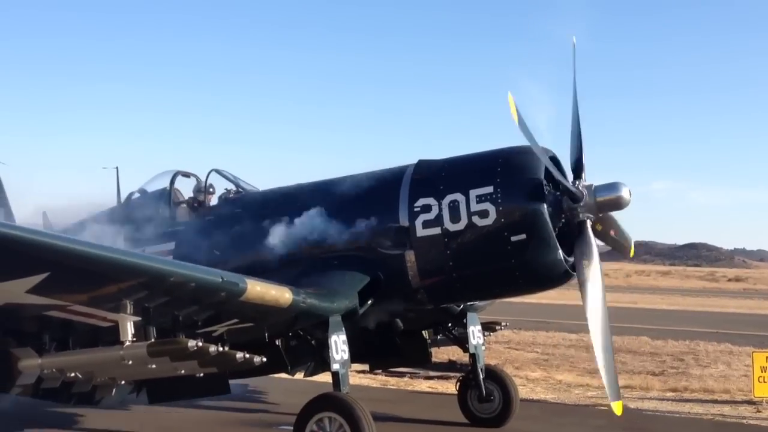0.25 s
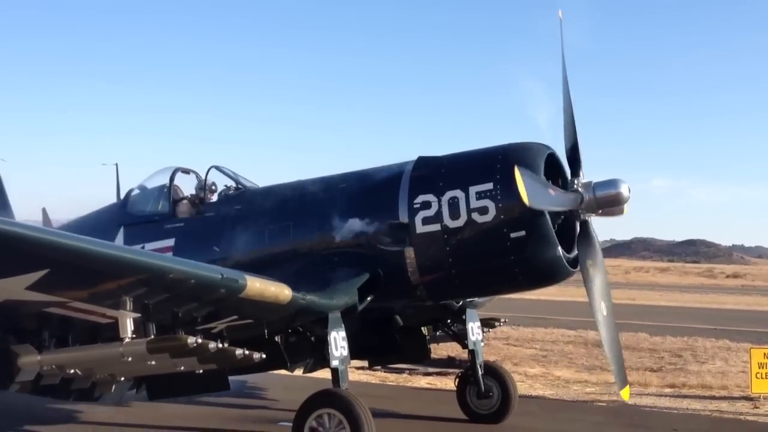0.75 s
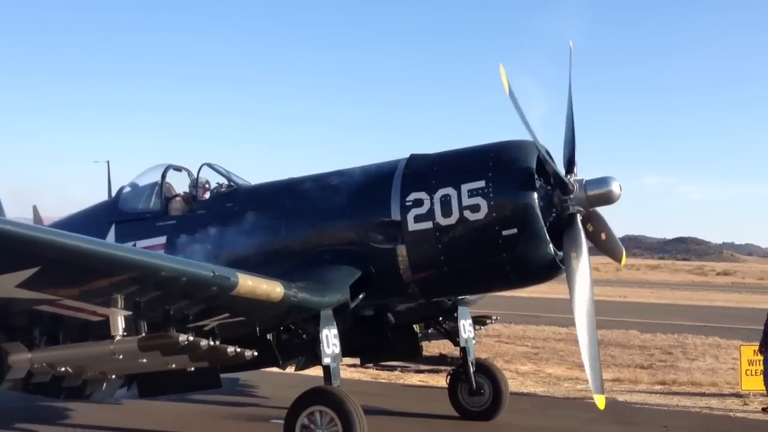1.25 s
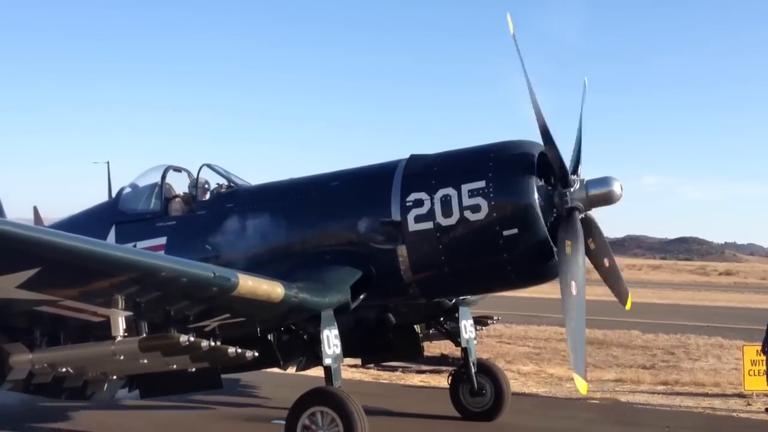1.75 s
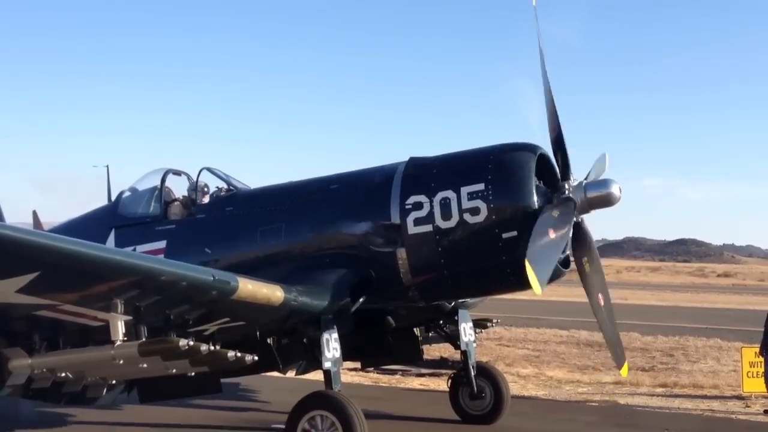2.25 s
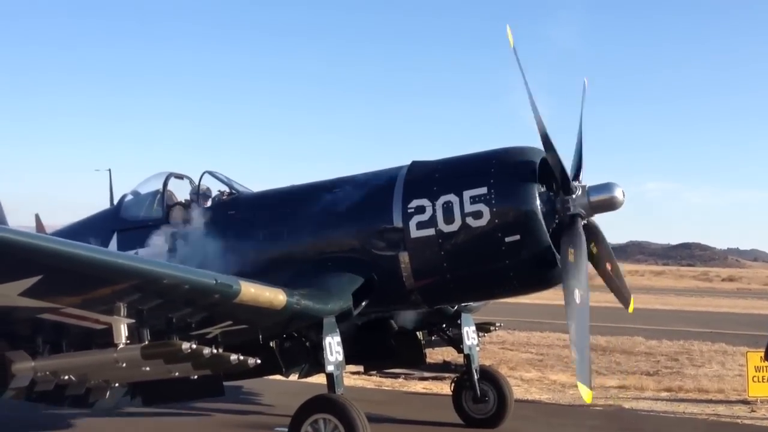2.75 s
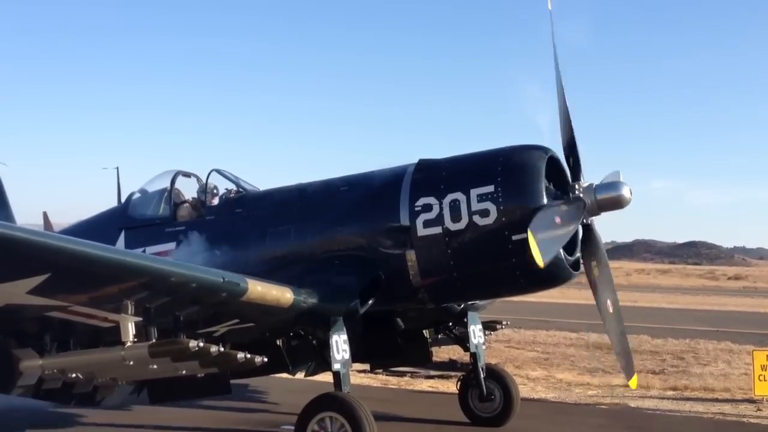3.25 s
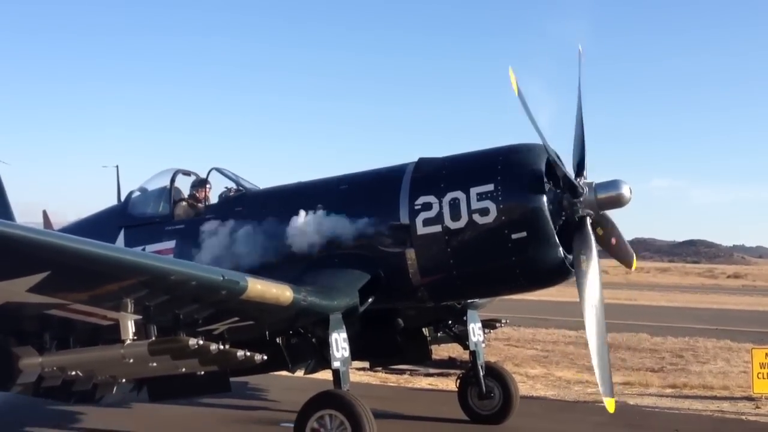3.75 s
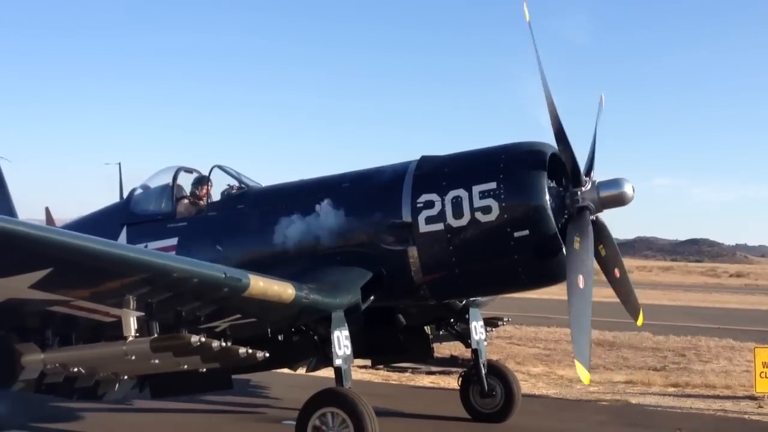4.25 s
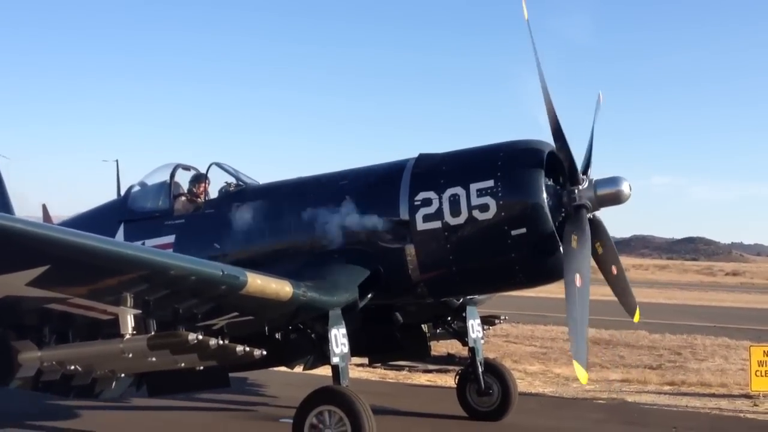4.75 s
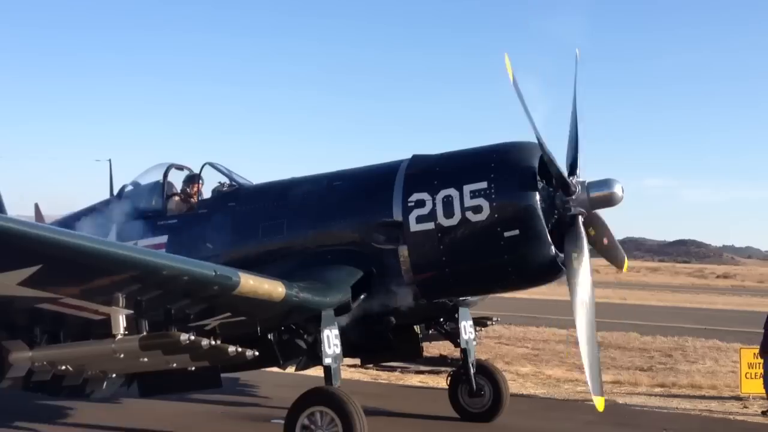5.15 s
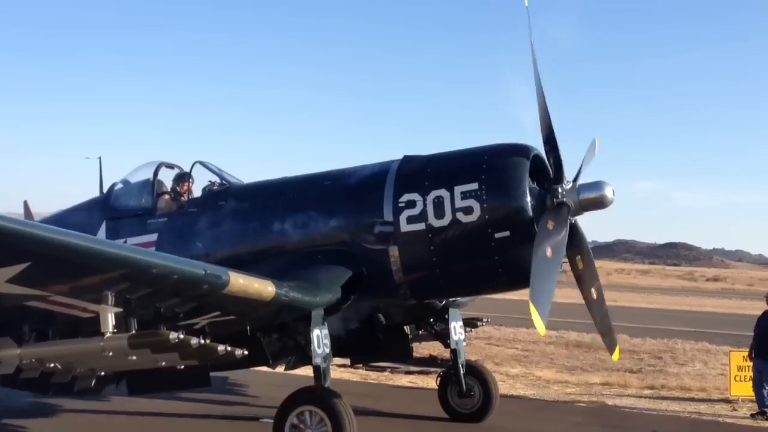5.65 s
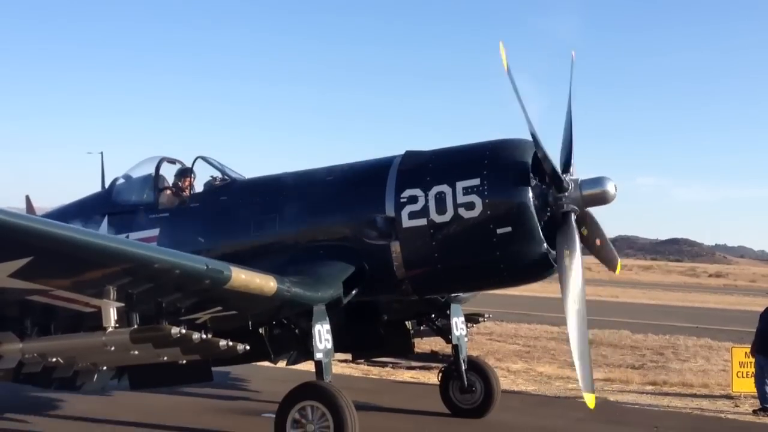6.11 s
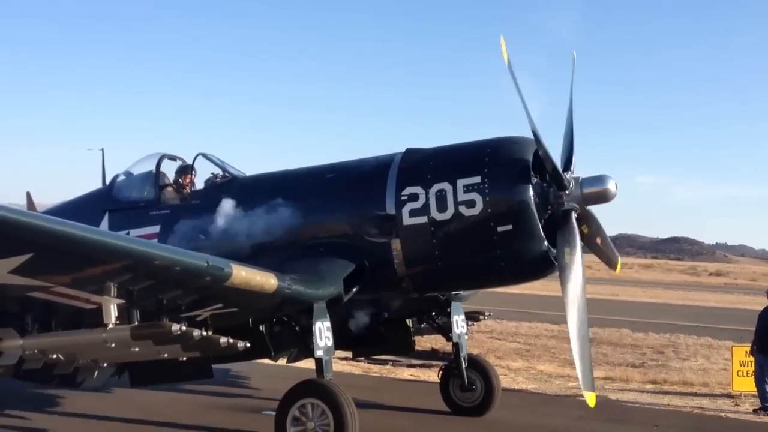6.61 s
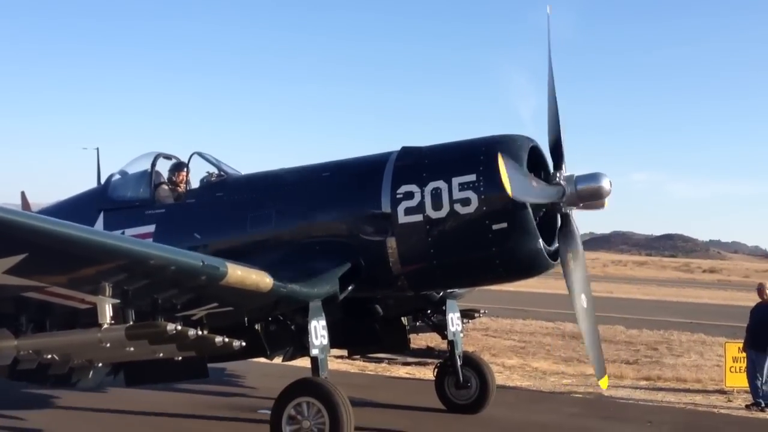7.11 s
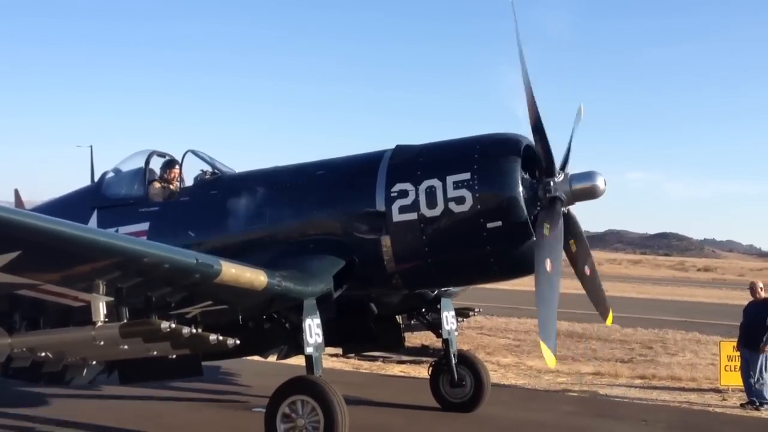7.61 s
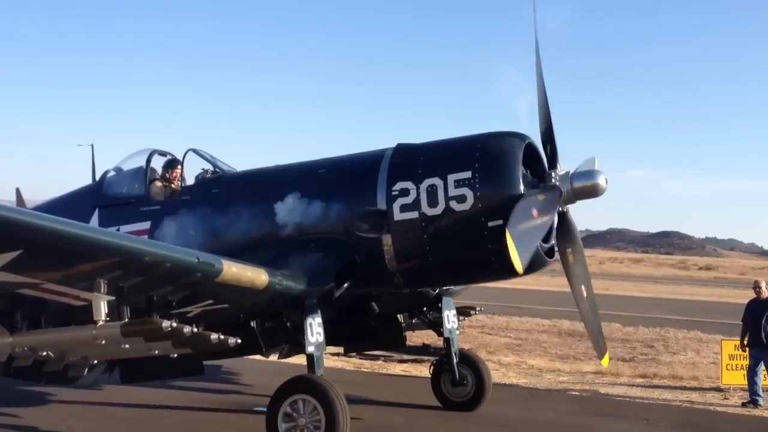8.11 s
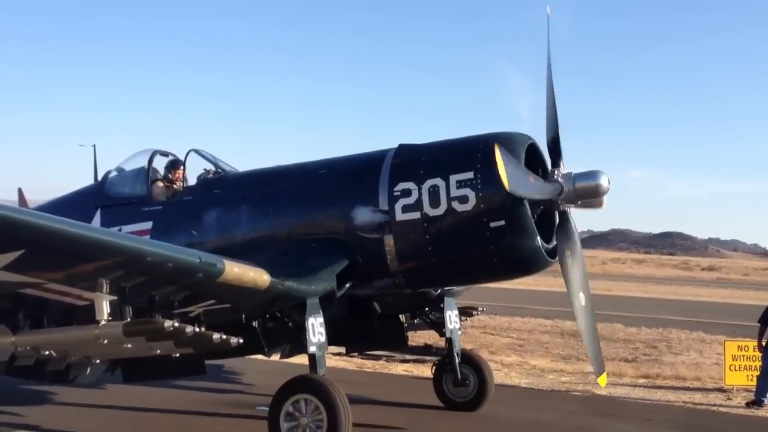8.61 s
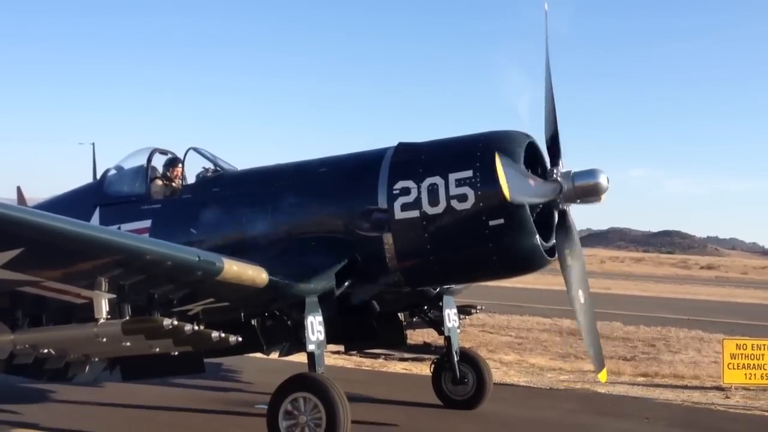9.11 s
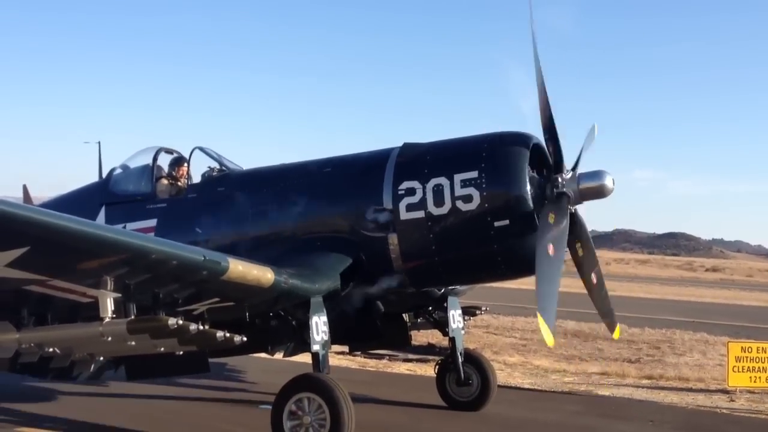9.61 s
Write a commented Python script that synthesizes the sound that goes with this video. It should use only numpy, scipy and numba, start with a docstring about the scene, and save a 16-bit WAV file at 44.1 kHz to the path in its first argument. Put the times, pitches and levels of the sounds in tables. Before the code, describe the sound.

Close, dry outdoor sound of an old propeller aircraft engine catching and stumbling. Each puff of exhaust spits a hissy, gritty burst, some snapping open, others swelling softly, over short metallic-pipe knocks. The rhythm never settles into an even beat, though it grows denser. Low propeller-wash thumps appear in the later part, with one small metal tick midway, above quiet rumble and mechanical clatter. The small microphone is thin in bass and slightly saturated.

```python
"""On an open apron, a few metres from a small microphone, a big radial aero engine catches.
Each firing on the near side rings a short exhaust stub as damped resonances and blows a jet of noise.
Low thuds, probably propeller wash buffeting the microphone, are swinging pressure peaks. Beneath them,
random pulses rumble through low resonances, valve gear clatters, and metal ticks once."""
import sys
import numpy as np
from scipy import signal
from scipy.fft import rfft, irfft
from scipy.io import wavfile
from scipy.ndimage import uniform_filter1d
from numba import njit

SR = 44100
rng = np.random.default_rng(int(sys.argv[2]) if len(sys.argv) > 2 else 0)


def digitize_waveform(pressure):
    """Quantize a signal to 16-bit integers and store it at the path in sys.argv[1].

    Rows of a 2-D input are taken as channels; values are limited to [-1, 1].
    """
    field = np.atleast_2d(pressure).T
    bounded = np.clip(field, -1, 1)
    quanta = np.round(bounded * 32767).astype(np.int16)
    wavfile.write(sys.argv[1], SR, quanta)


N = 435266  # samples


def undb(db):
    """Decibel law: amplitude gain of a level in dB."""
    return 10 ** (np.asarray(db) / 20)


def unit(x):
    """Normalisation: scale a signal to rms 1."""
    return x / np.sqrt(np.mean(x ** 2))


def noise():
    """White noise: independent normal samples, equal power at all frequencies on average."""
    return rng.standard_normal(N)


@njit
def bandpass(x, centre_hz, width_hz):
    """State-variable resonator: two coupled integrators, with a movable centre where the gain is 1."""
    y, band, low = np.empty(len(x)), 0., 0.
    for i in range(len(x)):
        g = np.tan(np.pi * centre_hz[i] / SR)
        damping = width_hz / centre_hz[i]
        v = (band + g * (x[i] - low)) / (1 + g * (g + damping))
        band, low = 2 * v - band, low + 2 * g * v
        y[i] = damping * v
    return y


def resonate(x, modes, bend=0.95):
    """Modal superposition: steep resonances, neighbours in opposite sign; bend scales their pitch."""
    out = 0
    for k, (pitch_hz, width_hz, level_db) in enumerate(modes):
        centre_hz = pitch_hz * bend * np.ones(N)
        once = bandpass(x, centre_hz, 1.26 * width_hz)
        twice = bandpass(once, centre_hz, 1.72 * width_hz)
        out = out + (-1) ** k * undb(level_db) * twice
    return out


def coloured(points):
    """Spectral shaping: filter noise to levels interpolated over log frequency, then scale to rms 1."""
    hz, level_db = np.transpose(points)
    f = np.fft.rfftfreq(N, 1 / SR) + 1
    gain = undb(np.interp(np.log(f), np.log(hz), level_db, left=-60))
    return unit(irfft(rfft(noise()) * gain, N))


def walk(rate):
    """Slow random modulation: rate levels per second, held and averaged twice, at rms 1."""
    hold = int(SR / rate)
    steps = np.repeat(rng.standard_normal(N // hold + 1), hold)
    return unit(uniform_filter1d(uniform_filter1d(steps, hold), hold)[:N])


def random_pulses(per_s, spread_db):
    """Poisson-like impulses: each sample may carry a pulse, with exponentially spread dB levels."""
    level_db = spread_db * np.minimum(rng.exponential(size=N), 3)
    return (rng.random(N) < per_s / SR) * undb(level_db)


def add(out, s, piece):
    """Superposition: mix a piece in at time s."""
    i = max(int(s * SR), 0)
    out[i:i + len(piece)] += piece[:len(out) - i]


def puff(rise_s, t60_s):
    """Valve discharge: flow that opens smoothly and empties exponentially, scaled to a top of 1."""
    t = np.arange(SR // 2) / SR
    shape = (1 - np.exp(-t / max(rise_s, 2e-4))) ** 2 * 1000 ** (-t / max(t60_s, .01))
    return shape / shape.max()


# Near firings; the levels set the balance before colouring:
# start_s [s], level_db [dB, jet], opening_ms [ms], t60_ms [ms, jet], knock_db [dB re jet, stub]
NEAR_FIRINGS = [(-0.003, -17, 1.5, 310, -4), (0.034, -11, 14.0, 51, -12.0), (0.138, -17.5, 7.9, 490, -15),
                (0.2, -12.5, 7.2, 94, -8.5), (0.262, -12.5, 30, 66, -12.5), (0.298, -11.5, 3.8, 86, -13),
                (0.336, -20.5, 3.1, 310, -14), (0.435, -13, 26, 102, -10), (0.62, -19, 3.3, 310.0, -8),
                (0.733, -12, 1.5, 107, -11), (0.839, -15.5, 4.4, 180, -13.5), (0.891, -19.5, 4.4, 230, -8),
                (0.957, -12, 37, 62, -8.5), (0.997, -11, 2.5, 103, -13.0), (1.054, -17, 3.3, 250.0, -7.5),
                (1.141, -13, 19, 140, -13.0), (1.389, -12.5, 15.0, 95, -18), (1.447, -10.0, 0.94, 135, -9),
                (1.603, -17, 10.6, 160, -6.5), (1.684, -12.5, 16, 235, -8.5), (1.878, -15.5, 30, 124, -8),
                (1.939, -12.5, 3.8, 152, -16.0), (2.205, -20.5, 5.5, 146, -9.0),
                (2.29, -27.5, 23, 450, -7.5), (2.397, -12, 2.3, 120, -10), (2.465, -15.5, 53.0, 81, -9),
                (2.514, -12, 1.9, 127, -13.0), (2.577, -18, 63, 58, -3.5), (2.62, -22, 0.47, 95, -18),
                (2.67, -17.5, 9.6, 225, -8.5), (2.788, -15.5, 16, 123, -23), (2.88, -11, 5.2, 200, -12),
                (2.965, -16, 15, 146, -16), (3.025, -21.5, 5.2, 130.0, -9), (3.106, -12.5, 10, 65, -6.5),
                (3.139, -17, 16, 160, -11.5), (3.21, -26, 2.5, 270.0, -13), (3.317, -11, 1.8, 117, -12.5),
                (3.414, -11.5, 8.8, 62, -17), (3.458, -29.0, 24, 76.0, -18), (3.58, -18.5, 44, 120, -2),
                (3.664, -12.5, 2.6, 250, -10.0), (3.768, -15.5, 3.8, 200, -3.5),
                (3.856, -18.5, 17, 155, -6.5), (3.918, -14.5, 4.1, 226, -13.5), (4.044, -14, 61, 69, -8.5),
                (4.084, -19, 7.9, 131.0, -2), (4.131, -21, 18, 98, -20), (4.19, -13, 0.85, 120, -10),
                (4.258, -15.5, 11.0, 89, -6.5), (4.299, -14.5, 12, 140, -15), (4.349, -16, 6.0, 210, -4),
                (4.443, -16.5, 27, 134, -18), (4.55, -28.0, 4.7, 220, -15), (4.605, -18.5, 8.3, 260, -8.5),
                (4.686, -24.5, 2.9, 380, -9), (4.784, -12.5, 3.5, 140, -6), (4.859, -13, 7.7, 260, -9.5),
                (4.911, -11, 15.0, 37, -6), (4.973, -17.5, 26, 65, -14), (5.009, -12.5, 18.0, 115, -11.5),
                (5.065, -14.5, 4.1, 150, -11), (5.107, -11.5, 3.5, 260, -27),
                (5.159, -11.5, 22, 65.0, -11.0), (5.294, -13, 15, 127, -7.5), (5.451, -11, 16.0, 67, -6),
                (5.573, -9, 1.6, 100, -10), (5.669, -12.5, 3.9, 210, -17), (5.719, -14, 5, 115, -7),
                (5.797, -16.5, 11.5, 260, -10.0), (5.85, -14.5, 19, 140, -5), (5.936, -13, 5.4, 240, -5.5),
                (6.086, -15.0, 3.8, 153, -4), (6.198, -10, 1, 86, -8.0), (6.288, -16.5, 9.2, 114, -9.0),
                (6.338, -14, 0.9, 156, -8), (6.409, -15, 6.3, 194, -12), (6.546, -18, 6.5, 240, -6),
                (6.617, -18.5, 15.0, 194.0, -11.0), (6.69, -10.0, 4, 82, -7.5), (6.747, -15, 32, 180, -11),
                (6.795, -11.5, 14.0, 37, -8), (6.847, -12, 23.0, 59, -10), (6.878, -13.5, 12, 106, -12),
                (6.924, -13, 8, 74, -11), (6.974, -27, 10, 63.0, -11), (7.007, -10, 2.9, 85, -14.5),
                (7.186, -17.5, 16, 230, -4.5), (7.26, -15, 7.1, 190.0, -7.5), (7.338, -21, 32.0, 60.0, -15),
                (7.365, -12, 0.82, 120, -10.0), (7.413, -16, 41, 70, -12), (7.449, -14, 3.8, 210, -9),
                (7.494, -14, 19.0, 54, -7.0), (7.573, -11, 1.6, 95, -21), (7.608, -15, 1.6, 220, -7.5),
                (7.727, -28.5, 8, 400, 2.5), (7.818, -13.5, 5.5, 176, -3), (7.919, -12.5, 3, 90, -9),
                (7.951, -21.5, 29, 120, -10.0), (7.998, -15, 2.3, 310, -10),
                (8.037, -12.5, 17.0, 65, -10.0), (8.112, -12, 2.9, 106, -9), (8.14, -14, 15.0, 140, -4.0),
                (8.232, -11.5, 0.81, 155, -14), (8.344, -14, 8.2, 175, -4), (8.444, -10, 1.3, 120.0, -8),
                (8.522, -12.5, 4.6, 240, -11), (8.561, -15.5, 14, 73.0, -6.5), (8.64, -11.5, 2.8, 73, -15),
                (8.664, -16, 9.5, 210, -11), (8.751, -14.5, 3.2, 235, -9), (8.871, -13.5, 6.2, 160, -6.5),
                (8.965, -12.5, 0.83, 135, -7.5), (9.041, -16, 4.6, 300, -7), (9.082, -14.5, 36, 51, -5),
                (9.155, -12, 2.4, 160, -14), (9.185, -15.0, 11, 179.0, -5.5), (9.262, -12.5, 10.7, 86, -7),
                (9.313, -28.5, 2.3, 474.0, -6), (9.378, -12.5, 5.6, 147, -6), (9.467, -12.5, 1.6, 88, -9),
                (9.539, -16.5, 8.8, 144, -8), (9.575, -17.0, 5.5, 170, -5.5), (9.649, -12, 4.6, 74, -12.0),
                (9.673, -15, 13.0, 170, -4.5), (9.748, -12.5, 52, 68, -8), (9.805, -28, 2.7, 190, -12),
                (9.861, -17.0, 11.0, 110, -4)]
USUAL_JET_DB = -15
ROAR_DB, ROAR_PER_DB, ROAR_SCATTER_DB = -7.5, -.5, 2.5  # roar re jet: weak jets roar more


def discharge(draws):
    """Valve discharge: power envelopes of jet, throat and stub, and a short pressure pulse per firing."""
    jet, throat, stub, pulses = np.zeros((4, N))
    bleed = undb(-23) * puff(0.079, 0.33)  # the last gas leaks out after the blast
    for (s, level_db, opening_ms, t60_ms, knock_db), draw in zip(NEAR_FIRINGS, draws):
        rise, t60 = opening_ms / 1000, t60_ms / 1000
        roar_db = ROAR_DB + ROAR_PER_DB * (level_db - USUAL_JET_DB) + ROAR_SCATTER_DB * draw[3]
        jet_power = puff(rise, t60) ** 2 + bleed ** 2
        throat_power = puff(1.98 * rise, 0.85 * t60) ** 2 + bleed ** 2
        stub_power = puff(0.92 * rise, 0.79 * t60) ** 2
        add(jet, s, undb(level_db) ** 2 * jet_power)
        add(throat, s + 0.0031, undb(level_db + roar_db) ** 2 * throat_power)
        add(stub, s - .002, undb(level_db + knock_db) ** 2 * stub_power)
        # a short pressure pulse near the opening, later and weaker when the valve opens slowly
        pulse = np.hanning(40) / (1 + rise / 0.031)
        add(pulses, s - .003 + .7 * rise, undb(level_db + knock_db) * pulse)
    return jet, throat, stub, pulses


# Noise spectrum feeding the gas jet: pitch_hz [Hz], level_db [dB per Hz, relative]
JET_SPECTRUM = [(1470, -19), (2500, -9), (3520, -11.5), (4800, -0.5), (5270, -3), (6450, 0), (7650, -2.5),
                (8870, 0.5), (9810, -5), (12200, 4), (15300, -8.5), (15600, -22), (16000, -35)]
CRACKLES_PER_S, CRACKLE_DB = 300, -19  # sharp pops inside the jet


def gas_jet(jet, ragged, chance):
    """Turbulent jet noise: eddies and two broad bands of hiss, gated by the flow."""
    pops = random_pulses(CRACKLES_PER_S, 4)
    broad = coloured(JET_SPECTRUM) * (1 + undb(CRACKLE_DB) * unit(uniform_filter1d(pops, size=30)))
    # two broad bands of hiss, shifted in pitch at random on every firing
    bands = resonate(broad, [(5690, 1300, 0)], 1.145 ** chance[0])
    bands = bands + resonate(broad, [(10630, 1460, -1)], 1.14 ** np.clip(chance[1], -2, 2))
    # eddies of each size come and go on their own, so the colour shifts within a blast
    eddies = 0
    for hz in 3000 * 1.3 ** np.arange(7):
        eddies = eddies + undb(6.3 * walk(45)) * bandpass(broad, np.full(N, hz), hz / 1.8)
    gas = eddies + undb(1.5) * bands
    # colour moves, the flow sets the level
    steady = gas / np.sqrt(uniform_filter1d(gas ** 2, size=SR // 40))
    hiss = np.sqrt(jet) * ragged * steady
    # slow gas hisses duller: the top fades faster than the rest
    top = bandpass(hiss, np.full(N, 12000.), 9400.0)
    return hiss + top * ((jet / jet.max()) ** 0.2 * 1.22 - 1)


# Throat resonances before resonate's default bend: pitch_hz [Hz], width_hz [Hz, nominal], level_db [dB]
THROAT_MODES = [(1036, 57, 0), (1437, 360, -7), (2236, 900, -3.5)]
# Bark pitches, one chosen per firing, before a small detuning and drift: pitch_hz [Hz]
BARK_PITCHES = [1360, 1522, 1889, 2150, 2307]


def throat_roar(throat, ragged, latest):
    """Cavity resonance: flow noise excites the throats, and each firing barks in one of them."""
    pitch_hz = rng.choice(BARK_PITCHES, len(NEAR_FIRINGS))[latest] * 1.03 ** walk(30)
    bark = unit(resonate(noise(), [(0.99, 65, 0)], pitch_hz))
    body = unit(resonate(noise(), THROAT_MODES))
    return np.sqrt(throat) * ragged * (undb(-3.0) * body + undb(-7) * bark)


# Stub resonances before each firing's bend: pitch_hz [Hz], width_hz [Hz, nominal], level_db [dB]
STUB_MODES = [(422, 76, 3.5), (595, 100, -11), (891, 116, -2)]


def stub_knock(stub, pulses, bend):
    """Pipe resonance: pressure pulses strike the stub's modes and flow noise keeps them ringing."""
    ring = undb(1.0) * np.sqrt(stub) * unit(resonate(noise(), STUB_MODES, bend))
    return ring + undb(13.5) * resonate(pulses, STUB_MODES, bend)


def near_stubs():
    """Source and resonator: each firing's discharge drives jet, throat and stub, the pitches redrawn."""
    draws = rng.standard_normal((len(NEAR_FIRINGS), 4))
    jet, throat, stub, pulses = discharge(draws)
    starts = np.array(NEAR_FIRINGS)[:, 0]
    latest = np.maximum(np.searchsorted(starts, np.arange(N) / SR + 0.00265) - 1, 0)
    chance = draws[latest].T  # the draws of the latest firing, held
    ragged = undb(0.32 * walk(200) + 1.2 * walk(50))
    hiss = gas_jet(jet, ragged, chance)
    roar = throat_roar(throat, ragged, latest)
    return hiss + roar + stub_knock(stub, pulses, 1.084 ** chance[2])


# Low thuds, probably propeller wash buffeting the microphone:
# start_s [s, at the crest], level_db [dB, nominal], t60_ms [ms]
LOW_THUDS = [(3.079, -8, 16), (3.629, -10.5, 92), (3.666, -5.5, 14), (3.799, -11.5, 29), (3.832, -14.5, 61),
             (4.178, -13, 28), (4.275, -7.5, 30), (4.297, -14, 27), (4.418, -11, 27), (4.688, -10.5, 22),
             (4.778, -12.5, 23), (5.083, -6, 12), (5.461, -13, 22), (5.53, -9.5, 18), (6.009, -10, 32),
             (6.029, -15, 22), (6.141, -1, 28), (6.169, -20.5, 81), (6.198, -10, 27), (7.219, -11.5, 26),
             (7.261, -9.5, 35), (7.329, -17, 27), (7.356, -15, 22), (7.739, -14, 42), (7.913, -9.5, 21),
             (8.205, -15, 27), (8.233, -8, 19), (8.458, -16.5, 24), (9.144, -15.5, 31)]
THUD_HZ, THUD_SCATTER = 214, 0.079  # usual pitch and its relative spread
THUD_SWELL_PER_S = 0.95  # long thuds swell more slowly
FLUTTER_RAD, FLUTTER_DB = 1.1, 4  # later swings come unevenly


def thuds():
    """Damped oscillation: a steep pressure peak swings back; most die quickly, some flutter on."""
    out, t = np.zeros(N), np.arange(SR // 2) / SR
    wander = np.array([walk(90), walk(90)])
    for (s, level_db, t60_ms), draw in zip(LOW_THUDS, rng.standard_normal(len(LOW_THUDS))):
        hz, t60 = THUD_HZ * (1 + THUD_SCATTER * draw), t60_ms / 1000
        lead = 0.18 / hz  # time from start to crest
        i, late = int(s * SR), np.clip(t * hz / 3, 0, 1)
        drift, lump = wander[:, i:i + len(t)] * late
        shape = puff(THUD_SWELL_PER_S * t60 ** 2, t60) * undb(FLUTTER_DB * lump)
        phase = 2 * np.pi * hz * (t - lead) + FLUTTER_RAD * drift
        wave = shape * (np.cos(phase) + 0.4 * np.cos(2 * phase))
        # no net push is left in the air
        balanced = wave - shape * wave.sum() / shape.sum()
        add(out, s - lead, undb(level_db) * balanced)
    return signal.sosfilt(signal.butter(2, 80, "high", fs=SR, output="sos"), out)


# One lone metal tick: start_s [s], level_db [dB, before decay], pitch_hz [Hz], decay_s [s]
METAL_TICK = (5.5288, -7, 1600, .0005)


def tick():
    """Heavily damped oscillation: a decaying sine of about one cycle sounds as one broad click."""
    out, (s, level_db, hz, decay_s) = np.zeros(N), METAL_TICK
    t = np.arange(SR // 100) / SR
    add(out, s, -undb(level_db) * np.sin(2 * np.pi * hz * t) * np.exp(-t / decay_s))
    return out


# Churn between firings, interpolated: start_s [s], rumble_db [dB, mean], clatter_db [dB, mean]
CHURN_LEVELS = [(0.0, -37.5, -35), (2.28, -38, -37.5), (3.08, -31, -34.5), (3.55, -36, -41.5),
                (3.82, -28, -37), (5.25, -31, -33.5), (6.02, -26.5, -37), (6.38, -34.5, -36.5),
                (6.82, -31.5, -35.5), (7.09, -30, -32.5), (8.16, -30.5, -35), (9.87, -34, -35)]
# Rumble resonances before resonate's default bend: pitch_hz [Hz], width_hz [Hz, nominal], level_db [dB]
RUMBLE_MODES = [(119.6, 88, -6), (167.3, 77, 2.5), (244, 115, -5.5), (424, 156, -1.5)]
# Clatter resonances before resonate's default bend: pitch_hz [Hz], width_hz [Hz, nominal], level_db [dB]
CLATTER_MODES = [(884, 152, 12.5), (1356, 320, 6), (2000, 890, 2.5), (6100, 7800, -12.5)]


def churn():
    """Random excitation: weak firings and propeller wash beat a lumpy rumble; valve gear clatters above."""
    s, *columns = np.transpose(CHURN_LEVELS)
    rumble_db, clatter_db = (np.interp(np.arange(N) / SR, s, c) for c in columns)
    beats = random_pulses(130, 1.7) + 0.05 * noise()
    rumble = undb(rumble_db + 2 * walk(20)) * unit(resonate(beats, RUMBLE_MODES))
    clatter = undb(clatter_db + 2 * walk(40)) * unit(resonate(noise(), CLATTER_MODES))
    return rumble + clatter


def scene():
    """Superposition: the pressures of all sources add at one microphone."""
    return (near_stubs() + thuds() + tick() + churn())[None]


MIC_LOW_HZ, TOP_HZ = 93, 15400  # edges of the microphone's band
CEILING = .64  # amplitude that the rounded peaks approach


def record(dry):
    """Band limiting and saturation: the small microphone drops bass, rounds peaks and cuts the top."""
    thin = signal.sosfilt(signal.butter(2, MIC_LOW_HZ, "high", fs=SR, output="sos"), dry)
    rounded = CEILING * np.tanh(thin / CEILING)
    return signal.sosfilt(signal.ellip(10, .2, 75, TOP_HZ, fs=SR, output="sos"), rounded)


dry = scene()
out = record(dry)
digitize_waveform(out)
```